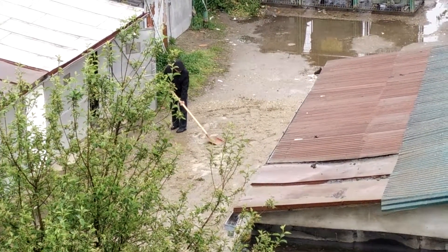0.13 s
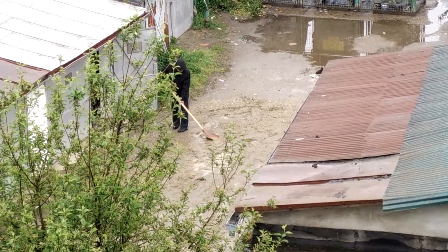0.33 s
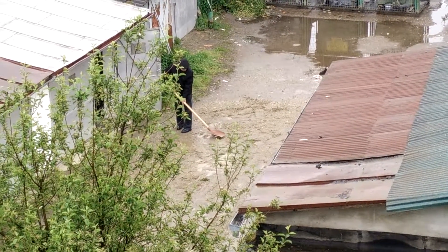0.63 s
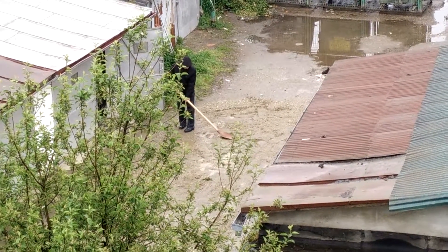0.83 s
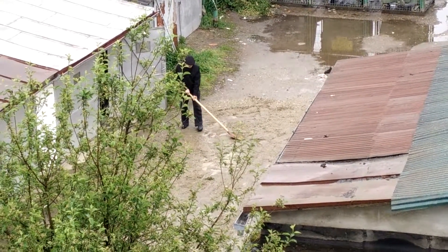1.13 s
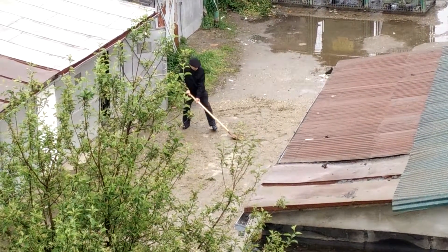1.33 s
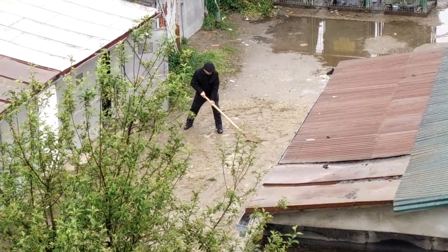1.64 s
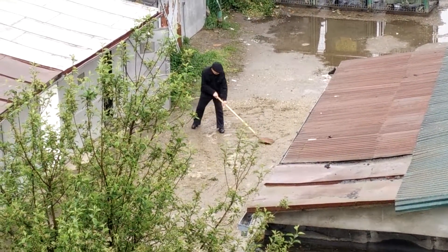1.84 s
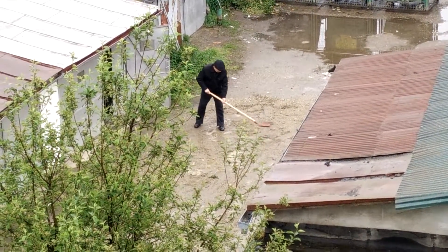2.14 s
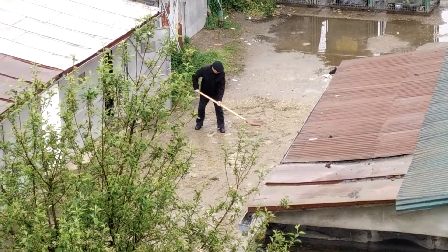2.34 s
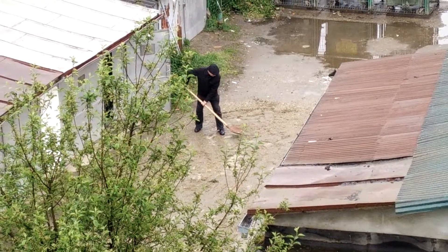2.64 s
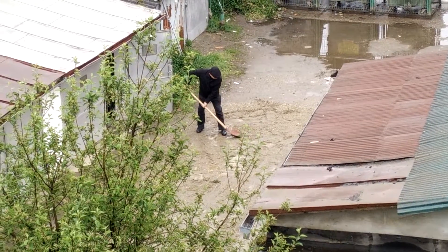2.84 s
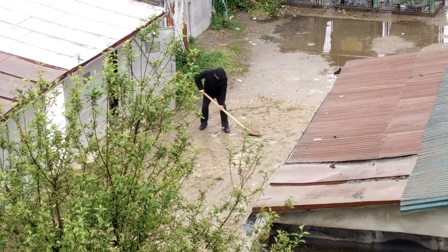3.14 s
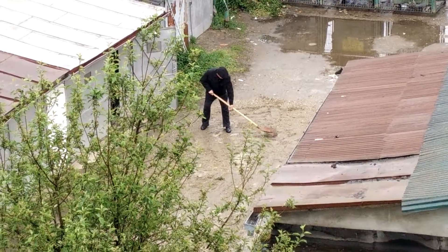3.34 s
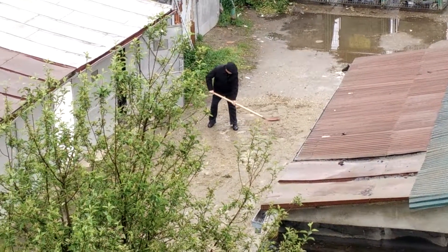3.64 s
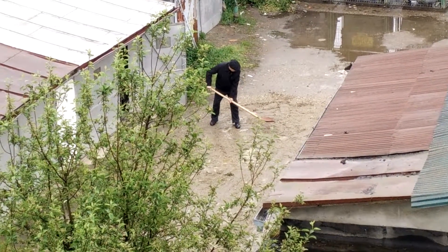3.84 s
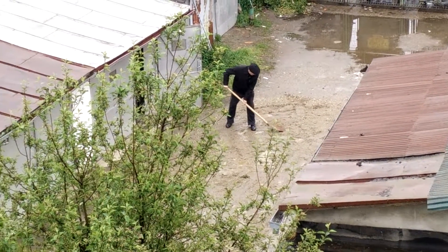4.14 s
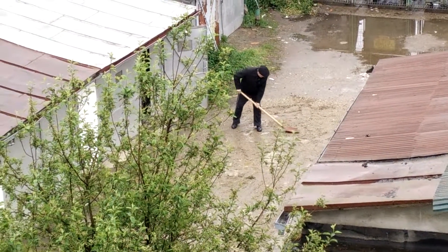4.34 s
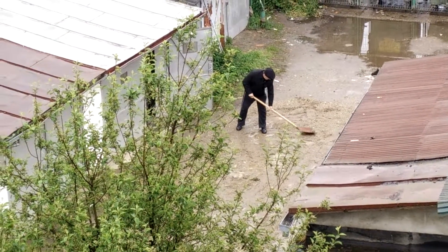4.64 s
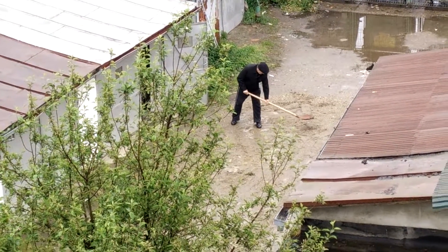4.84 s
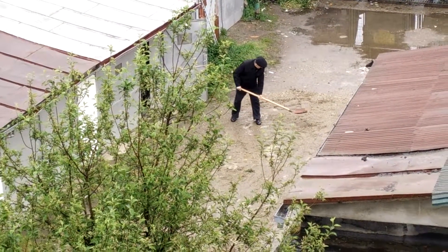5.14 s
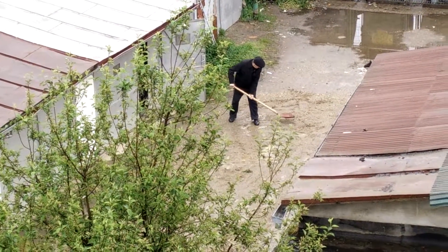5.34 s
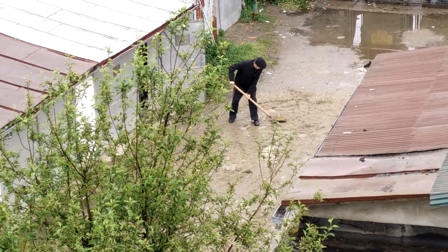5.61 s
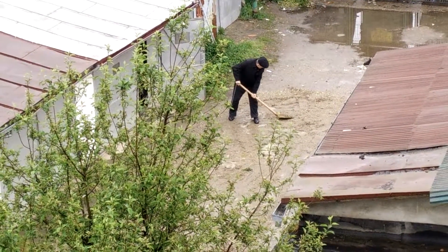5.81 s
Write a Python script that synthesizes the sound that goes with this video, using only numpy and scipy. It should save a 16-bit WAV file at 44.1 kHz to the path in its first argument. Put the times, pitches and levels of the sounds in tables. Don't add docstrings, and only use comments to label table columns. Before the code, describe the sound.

A steady low engine drone and soft wet-air hiss lie under bright, dry-edged broom scratches on sandy, wet ground. Three strokes come early, one at three seconds, one past four, and a last one at the end. Between them are light bristle brushes, brief bird chirps and roof drips. Short wall reflections; small stereo microphone some distance above the yard.

```python
import sys
import numpy as np
from scipy import signal
from scipy.fft import rfft, irfft, next_fast_len
from scipy.io import wavfile
from scipy.ndimage import uniform_filter1d

SR = 44100
rng = np.random.default_rng(int(sys.argv[2]) if len(sys.argv) > 2 else 0)


def decibels_to_gain(level_db):
    exponent = np.asarray(level_db, float) / 20
    return 10 ** exponent


def materialize(psi):
    bounded = np.clip(np.atleast_2d(psi).T, -1, 1)
    quanta = np.round(bounded * 32767).astype(np.int16)
    wavfile.write(sys.argv[1], SR, quanta)


N = 263277


def evened(x):
    return x / np.sqrt(np.mean(x ** 2) + 1e-20)


def read(points, hz):
    f, value = np.transpose(points)
    return np.interp(np.log(hz + 1), np.log(f + 1), value)


def colour(x, gain_db):
    size = next_fast_len(N)
    gain = decibels_to_gain(gain_db(np.fft.rfftfreq(size, 1 / SR)))
    return irfft(rfft(x, size) * gain, size)[..., :N]


def resonate(x, hz, width_hz):
    turn = np.exp(2j * np.pi * np.cumsum(hz * np.ones(N)) / SR)
    r = np.exp(-np.pi * width_hz / SR)
    return 2 * (turn * signal.lfilter([1 - r], [1, -r], x / turn)).real


def drift(smooth_s):
    size = max(int(smooth_s * SR), 1)
    return evened(uniform_filter1d(uniform_filter1d(rng.standard_normal(N), size), size))


def patched(x, db, frames=3, bins=4):
    z = signal.stft(x, nperseg=256)[2]
    field = uniform_filter1d(rng.standard_normal(z.shape[1:]), bins, 0)
    field = uniform_filter1d(field, frames, 1)
    return signal.istft(z * decibels_to_gain(db * evened(field)), nperseg=256)[1][:, :N]


def walls(x, t60_s, start_s):
    t = np.arange(SR // 2) / SR
    signs = rng.choice([-1., 1.], (2, len(t)))
    hits = rng.random((2, len(t))) < .06
    taps = signs * hits * (t > start_s) * decibels_to_gain(-60 * t / t60_s)
    taps = taps / np.linalg.norm(taps, axis=1, keepdims=True)
    return signal.fftconvolve(x, taps, axes=1)[:, :N]


def pings(events, cycles, glide):
    out = np.zeros(N)
    t = np.arange(400) / SR
    for s, db, hz in events:
        tone = np.sin(2 * np.pi * hz * t * (1 + glide * hz * t))
        ping = decibels_to_gain(db) * tone * np.exp(-hz * t / cycles) * np.minimum(hz * t, 1)
        out[round(s * SR):][:len(t)] += ping
    return out


def bump(s, db, rise_s, fall_s):
    t = np.arange(N) / SR - s
    return decibels_to_gain(db) * np.exp(np.where(t < 0, t / rise_s, -t / fall_s))


def broom():
    # (time [s], peak level [dB], swell [s], fade [s])
    splash_events = [(0.135, -71, .006, 0.025), (0.63, -66, 0.09, .05), (3.02, -63, .008, .08),
                     (3.13, -60, .03, .04), (3.72, -71, .08, .04), (4.315, -65, .006, 0.036),
                     (4.735, -63, .01, .02), (5.25, -74, .03, .04), (5.58, -70, .03, .03),
                     (5.65, -71, .015, 0.027), (5.752, -66, .004, 0.017)]
    # (time [s], peak level [dB], pitch [Hz])
    grit_catches = [(0.1344, -38.5, 5650), (0.3474, -16, 3150), (0.3774, -9, 6000), (0.9058, -17, 5150),
                    (1.6444, -21, 5000), (1.7494, -17, 5350), (1.8756, -34, 5130), (3.0126, -20, 4930),
                    (4.7386, -20, 6250), (5.7458, -31, 4980)]
    scratch_db, low_db, knock_db, spray_db, pan_db = handling()
    slips = bristle_slips()
    scratch = bristle_scratch(slips)
    spray = water_spray(slips)
    head = broom_head(slips, scratch_db, low_db, knock_db)
    effort = decibels_to_gain(scratch_db + 0.1) + bites(fade_s=0.011)
    near = effort * (scratch + decibels_to_gain(np.minimum(spray_db, -8)) * spray) + head
    near = decibels_to_gain(pan_db * np.array([[.3], [-.3]])) * near
    near = near + sum(bump(*row) for row in splash_events) * spray
    near = near + decibels_to_gain(-13.0) * pings(grit_catches, cycles=12.6, glide=0.00039)
    near = colour(near, lambda hz: read([(300, -36), (650, 0)], hz))
    return near + decibels_to_gain(-7) * walls(near, t60_s=0.15, start_s=.006)


def handling():
    # (time [s], scratch level [dB])
    stroke_pressure = [
        [(0.0, -54), (0.105, -56.5), (0.135, -38), (0.18, -42), (0.35, -36), (0.47, -40.5), (0.55, -49.5),
         (0.78, -57), (0.888, -57)],
        [(0.895, -52), (0.908, -37.5), (0.926, -33), (1.004, -36.5), (1.138, -42.5), (1.3, -58.5), (1.36, -58)],
        [(1.41, -63), (1.53, -49.5), (1.65, -40.5), (1.73, -38), (1.85, -38.5), (1.894, -35.5), (1.964, -42.5),
         (2.05, -58), (2.14, -65)],
        [(2.995, -59), (3.017, -43), (3.041, -45), (3.127, -40), (3.267, -37), (3.371, -38), (3.417, -49.5),
         (3.52, -60)],
        [(4.28, -77), (4.312, -48.5), (4.335, -50), (4.38, -40), (4.45, -39.5), (4.64, -41.5), (4.715, -46.5),
         (4.79, -59), (4.9, -68)],
        [(5.73, -78), (5.748, -52), (5.78, -53.5), (5.81, -47), (5.845, -46), (5.93, -37), (5.97, -39)],
    ]
    # (low head ring [dB rel], head knock [dB rel], spray [dB rel], left-right [dB])
    stroke_grips = [(-15.5, -12, -16.5, -1.5), (-30, -12, -18.5, -3), (-17.5, -12.5, -20.5, -3),
                    (-24, -13.5, -23, -1), (-40, -14, -18.5, -1.5), (-32, -12.5, -18.5, -1)]
    # (time [s], peak level [dB], release [s], spray [dB rel])
    return_touches = [(2.256, -57, .012, -11), (2.284, -56.5, 0.045, -21), (3.766, -58.5, 0.041, -7),
                      (5.17, -68, .05, -9), (5.274, -60, .02, -15), (5.516, -57, .02, -20),
                      (5.544, -50.5, 0.028, -7), (5.646, -60, 0.014, -8)]
    touch_rise_s, touch_head_db = 0.01, -10.5
    full_db, head_follows, spray_follows = -38.5, 0.74, 0.99
    knock_rise_db_per_s, spray_fall_db_per_s = 5.5, 5

    t, out = np.arange(N) / SR, np.zeros((5, N))
    wet, brush = 1e-9, 1e-8
    for s, db, fall_s, spray_db in return_touches:
        wet = wet + bump(s, db + spray_db, touch_rise_s, fall_s)
        brush = brush + bump(s, db, touch_rise_s, fall_s)
    out[0] = 20 * np.log10(brush)
    out[1:3] = touch_head_db
    out[3] = 20 * np.log10(wet / brush)
    for rows, (low_db, knock_db, spray_db, pan_db) in zip(stroke_pressure, stroke_grips):
        s, db = np.transpose(rows)
        inside = (t >= s[0]) & (t <= s[-1])
        level_db = np.interp(t[inside], s, db)
        late_s = t[inside] - s[np.argmax(db)]
        drop_db = full_db - level_db
        slack_db = (1 - head_follows) * drop_db
        out[0, inside] = level_db
        out[1, inside] = low_db + slack_db
        out[2, inside] = knock_db + slack_db + knock_rise_db_per_s * late_s
        out[3, inside] = spray_db + (1 - spray_follows) * drop_db - spray_fall_db_per_s * late_s
        out[4, inside] = pan_db
    return out


def bristle_slips():
    sizes = decibels_to_gain(2.0 * np.minimum(rng.exponential(1, (3, N)), 4))
    slips = rng.standard_normal((3, N)) * sizes * (rng.random((3, N)) < 14000 / SR)
    slips = 0.82 * slips[0] + 0.63 * slips[1:]
    slips = patched(slips * decibels_to_gain(0.61 * drift(0.0044)), db=0.5)
    return patched(slips, db=1.2, frames=12, bins=2)


def bristle_scratch(slips):
    scratch_spectrum = [(700, -35), (1300, -16.5), (1700, -8), (2200, -1.5), (2500, -1), (2820, -4),
                        (3250, -3.5), (3930, -0.5), (5810, -1.5), (6750, -2), (7910, -11.5), (9500, -20.5),
                        (12400, -40)]
    tuft_tones = [(2430, 380, -34), (3400, 150, -19.5), (4970, 160, -23), (5820, 380, -15)]  # (frequency [Hz], width [Hz], level [dB])
    scratch = evened(colour(slips, lambda hz: read(scratch_spectrum, hz)))
    for hz, width_hz, db in tuft_tones:
        gain = decibels_to_gain(db + 4 * np.clip(drift(.015), -3, 1.6))
        tone = resonate(slips, hz * (1 + .07 * drift(.05)), width_hz)
        scratch = scratch + gain * evened(resonate(tone, hz, 3 * width_hz))
    return scratch


def water_spray(slips):
    spray_spectrum = [(6000, -17.5), (8500, 2), (11000, -8), (13500, -11), (16000, -29)]  # (frequency [Hz], density [dB per Hz])
    return evened(colour(slips, lambda hz: read(spray_spectrum, hz) - 60 * (hz < 6000)))


def broom_head(slips, scratch_db, low_db, knock_db):
    head_resonances = [(780, 310), (1140, 960)]  # (frequency [Hz], width [Hz])
    # (time [s], low ring [dB], knock [dB], fade [s])
    rut_thumps = [(0.102, -62, -52, 0.014), (0.455, -55, -47.5, 0.031), (0.6, -57, -66, 0.073),
                  (0.93, -58, -44.5, 0.045), (1.08, -66, -52, 0.038), (1.61, -60, -63, 0.036),
                  (1.76, -51, -49.5, 0.032), (1.9, -73, -53, 0.02), (3.27, -63, -51, 0.044),
                  (4.45, -77, -50.5, 0.047), (4.71, -60, -68, 0.016), (5.85, -65, -66, 0.018)]
    low, knock = (evened(resonate(resonate(slips, hz, width_hz), hz, width_hz))
                  for hz, width_hz in head_resonances)
    head = decibels_to_gain(scratch_db) * (decibels_to_gain(low_db - 3.5) * low + decibels_to_gain(knock_db - 2.0) * knock)
    for s, ring_db, thud_db, fade_s in rut_thumps:
        head = head + bump(s, 0, 0.017, fade_s) * (decibels_to_gain(ring_db) * low + decibels_to_gain(thud_db) * knock)
    return head


def bites(fade_s):
    bite_events = [(0.0922, -42), (0.125, -31.5), (0.2074, -29.5), (0.2853, -31), (0.339, -29),
                   (0.375, -32), (0.9078, -41), (1.495, -43), (1.5788, -44), (1.6312, -32), (1.8417, -38),
                   (1.9006, -37), (2.9876, -44), (3.0135, -37), (3.0874, -36), (3.1662, -30), (3.7673, -52),
                   (4.3101, -42), (4.362, -42), (4.738, -35), (5.1667, -47), (5.5318, -50), (5.7465, -38),
                   (5.8671, -45), (5.9304, -30)]
    train = np.zeros(N)
    for s, db in bite_events:
        train[round(s * SR)] = decibels_to_gain(db - 10.5)
    t = np.arange(4000) / SR
    return signal.oaconvolve(train, np.minimum(t / 0.0022, 1) * np.exp(-t / fade_s))[:N]


def birds():
    # (time from chirp start [s], pitch [Hz], level [dB])
    chirp_notes = [
        [(0, 3500, -14), (.005, 4300, -5), (.013, 5300, -4), (.019, 4450, -5), (.028, 4000, 0),
         (.035, 4150, -3), (.041, 3300, -8), (.043, 3000, -45)],
        [(.049, 3000, -45), (.053, 3080, -5), (.069, 3900, -3), (.078, 3500, -6), (.088, 3000, -10),
         (.093, 2850, -40)],
    ]
    # (time [s], level [dB], pitch factor [ratio], length factor [ratio])
    chirp_events = [(.809, -51.5, 1.0, .96), (2.926, -53, 1.0, 1.02), (3.98, -51, .99, 1.0),
                    (5.022, -49.5, 1.0, 1.02)]
    # (loudest time [s], level [dB], swell [s], fade [s])
    chatter_events = [
        (2.365, -56, 0.074, 0.11),
        (3.59, -57, 0.05, 0.14),
        (4.075, -53.5, 0.015, 0.028),
    ]

    s, hz, db = np.vstack(chirp_notes).T
    out = np.zeros(N)
    rasp = 1 + .014 * drift(.0008)
    flutter_db = 2.0 * drift(.003)
    for start_s, level_db, factor, length in chirp_events:
        t = np.arange(0, s[-1], 1 / SR / length)
        first = round(start_s * SR)
        at = slice(first, first + len(t))
        pitch_hz = factor * np.interp(t, s, hz) * rasp[at]
        tone = np.sin(2 * np.pi * np.cumsum(pitch_hz) / SR)
        out[at] += np.sqrt(2) * decibels_to_gain(level_db + np.interp(t, s, db) + flutter_db[at]) * tone
    echoes = decibels_to_gain(-14) * np.roll(out, 1150) + decibels_to_gain(-5.5) * walls(out[None], t60_s=.3, start_s=.004)
    far = resonate(rng.standard_normal((2, N)), 3800 + 250 * drift(.015), 750)
    far = evened(resonate(far, 3800, 1100))
    far = sum(bump(*row) for row in chatter_events) * decibels_to_gain(1.4 * drift(0.013)) * far
    return out * decibels_to_gain(np.array([[.8], [-.8]])) + echoes + far


def roof_drips():
    drip_events = [(3.767, -33, 5460), (4.0225, -38, 5400), (5.2021, -29.5, 4400), (5.242, -39, 4800),
                   (5.3672, -32, 4400)]
    drips = pings(drip_events, cycles=1.8, glide=0.0186)
    return drips + decibels_to_gain(-9) * walls(drips[None], t60_s=.15, start_s=0.006)


def engine():
    # (time [s], rate [cycles/s])
    cycle_speed = [(0.0, 7.394), (0.85, 7.366), (1.71, 7.392), (2.56, 7.362), (3.41, 7.355), (4.26, 7.332),
                   (5.12, 7.336), (5.97, 7.35)]
    main_orders = [(8, -48.8), (12, -54.8), (16, -62.0), (18, -63.4), (19, -52.4), (20, -55.4), (23, -68.6),
                   (24, -54.1), (25, -59.7), (27, -63.5), (28, -61.5), (32, -60.3), (33, -66.1)]
    faint_orders = [(4, -76), (9, -70), (17, -71), (26, -69), (39, -72), (40, -71), (44, -73), (48, -73)]  # (multiple of the cycle, level [dB rms])
    # (time [s], level [dB rms])
    exhaust_level = [(0.0, -43), (0.25, -49), (0.58, -48.5), (1.0, -50.5), (1.55, -45.5), (1.65, -48.5),
                     (2.05, -47.5), (2.58, -50), (2.74, -42.5), (2.92, -55), (3.19, -50), (3.32, -47),
                     (3.43, -49.5), (3.72, -50), (3.85, -48.5), (5.14, -48.5), (5.62, -50), (5.97, -50.5)]
    strong_firing_cycles, pipe_lag_cycles = .55, .022

    t = np.arange(N) / SR
    cycles = np.cumsum(np.interp(t, *np.transpose(cycle_speed))) / SR
    path = rng.random(128)[::2]
    out = sum(decibels_to_gain(db) * np.cos(2 * np.pi * (k * cycles + path[14 + k])) for k, db in faint_orders)
    exhaust_db = np.interp(t, *np.transpose(exhaust_level)) + 1.06 * drift(.08)
    for k, db in [(8, exhaust_db)] + main_orders[1:]:
        lag = strong_firing_cycles * k + pipe_lag_cycles * (k - 19) ** 2 / 2
        out += decibels_to_gain(db) * np.cos(2 * np.pi * (k * cycles - lag + path[int(k + 1) // 4]))
    return np.sqrt(2) * out * np.ones((2, 1))


def background():
    port_likeness = [(60, 0.99), (130, 0.78), (290, 0.97), (640, 0.34), (1410, -0.1), (3100, 0.18),
                     (6820, -0.67), (15000, 0.34)]
    rumble_spectrum = [(25, -27), (38, -4), (56, -6.5), (75, 1.5), (105, -9.5), (138, -2.5), (200, -7),
                       (225, -7), (330, -8.5), (450, -13), (700, -26)]
    air_spectrum = [(300, -17.5), (480, -11), (700, 3.5), (1100, -2), (2100, -4.5), (2900, -8.5),
                    (3600, -4.5), (5000, -5.5), (6800, -8.5), (7450, -5.5), (8050, -18.5), (10500, -27.5),
                    (16000, -28.5)]
    size = next_fast_len(N)
    same = np.clip(read(port_likeness, np.fft.rfftfreq(size, 1 / SR)), -1, 1)
    left, other = rfft(rng.standard_normal((2, size)))
    right = same * left + np.sqrt(1 - same ** 2) * other
    noise = irfft(np.array([left, right]), size)[:, :N]
    rumble = evened(colour(
        noise, lambda hz: read(rumble_spectrum, hz) - 40 * (hz > 700) - 30 * (hz < 25)))
    air = evened(colour(patched(noise, db=1.5), lambda hz: read(air_spectrum, hz)))
    return decibels_to_gain(-51.5) * rumble + decibels_to_gain(-53.5 + .6 * drift(0.6)) * air


def scene():
    return broom() + birds() + roof_drips() + engine() + background()


def roll_off(x):
    return signal.sosfilt(signal.butter(12, 15800, fs=SR, output="sos"), x)


def record(dry):
    # (frequency [Hz], left-right level [dB], lag of the left [rad])
    port_pair = [(60, -0.6, 0), (203, -0.5, 0), (725, -1.5, -0.85), (1730, 0.5, 1.56), (2260, -1.5, 0.96),
                 (3450, 2.5, 0), (4930, 5, 0.38), (6070, 7.5, 2), (7280, 4, 1), (9170, -1.5, 3.5),
                 (11250, -7, 5), (13000, -6.5, 4), (16000, -11, 8)]
    size = next_fast_len(N)
    hz = np.fft.rfftfreq(size, 1 / SR)
    f, db, lag_rad = np.transpose(port_pair)
    half = np.array([[.5], [-.5]])
    gain = decibels_to_gain(half * read(np.c_[f, db], hz))
    phase = np.exp(-1j * half * read(np.c_[f, lag_rad], hz))
    ports = irfft(rfft(dry, size) * gain * phase, size)[:, :N]
    mix = ports + decibels_to_gain(-75) * rng.standard_normal((2, N))
    return roll_off(mix)


dry = scene()
out = record(dry)
materialize(out)
```